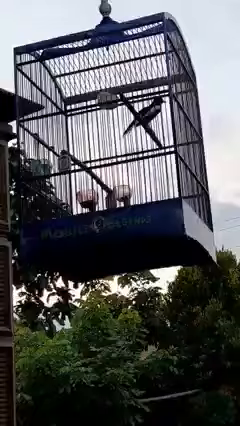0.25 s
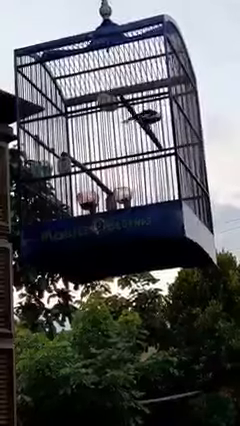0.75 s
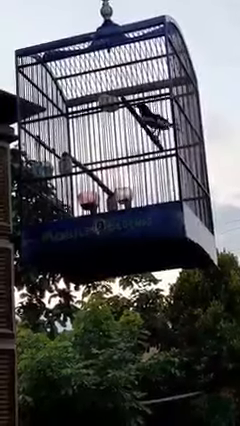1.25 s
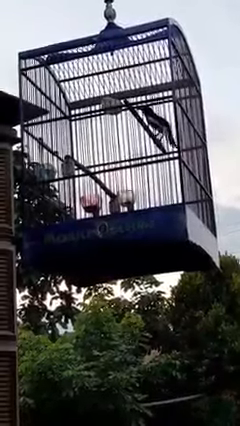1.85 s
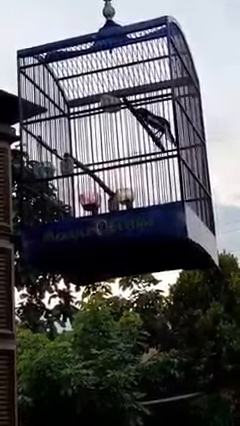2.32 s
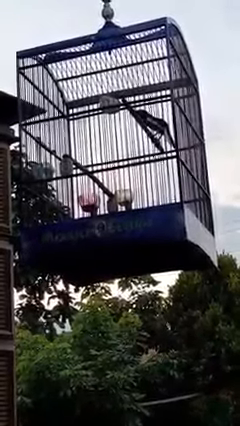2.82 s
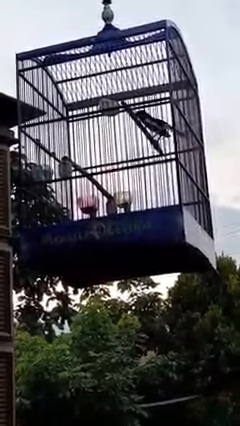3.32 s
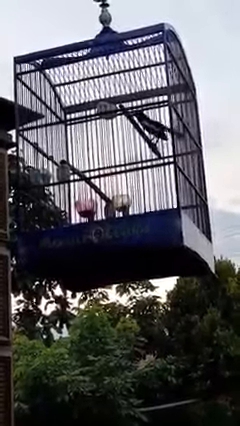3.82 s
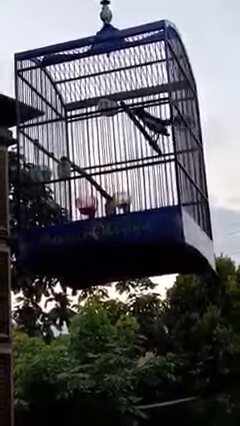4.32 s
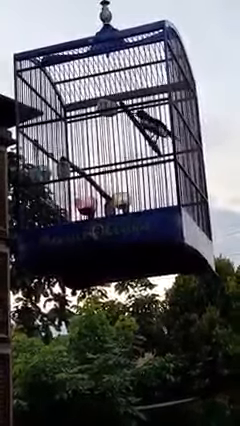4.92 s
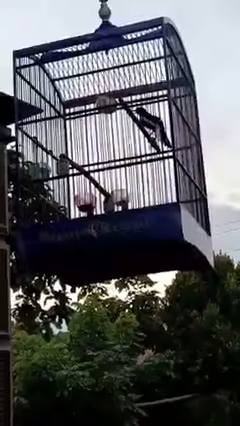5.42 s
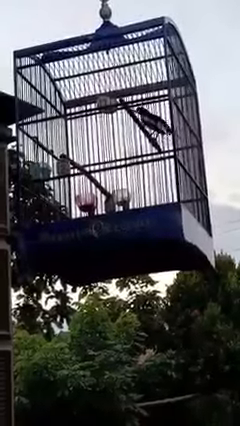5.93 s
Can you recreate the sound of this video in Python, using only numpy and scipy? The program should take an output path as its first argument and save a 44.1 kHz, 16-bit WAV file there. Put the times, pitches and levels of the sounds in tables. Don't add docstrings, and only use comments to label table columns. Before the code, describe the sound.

Bright, quick bird notes and raspy bursts ring off nearby walls, with small cage ticks, soft distant poultry and low traffic underneath.

```python
import sys
import numpy as np
from scipy import signal
from scipy.fft import rfft, irfft, next_fast_len
from scipy.io import wavfile
from scipy.ndimage import uniform_filter1d, map_coordinates

SR = 44100
rng = np.random.default_rng(int(sys.argv[2]) if len(sys.argv) > 2 else 0)


def amp(db):
    return 10 ** (np.asarray(db, float) / 20)


def write(x):
    x = np.atleast_2d(x).T
    wavfile.write(sys.argv[1], SR, np.round(np.clip(x, -1, 1) * 32767).astype(np.int16))


N = 271653
TOP_HZ = 15780


def unit(x):
    return x / np.sqrt(np.mean(x ** 2) + 1e-20)


def along(points, hz):
    f, v = np.transpose(points)
    return np.interp(np.log(hz + 1), np.log(f + 1), v)


def wobble(rate_hz):
    knots = rng.standard_normal(int(N * rate_hz / SR) + 4)
    return map_coordinates(knots, [np.arange(N) * rate_hz / SR])


def filtered(x, response):
    m = next_fast_len(N + SR // 2)
    return irfft(rfft(x, m) * response(np.fft.rfftfreq(m, 1 / SR)), m)[..., :N]


def sung(rows, gesture):
    notes = []
    for s, length_s, from_hz, to_hz, db in rows:
        notes.append([(s + along_s * length_s, from_hz + min(glide, 1) * (to_hz - from_hz), db + under_db, second_db)
                      for along_s, glide, under_db, second_db in gesture])
    return notes


def voice(notes, jitter, flutter_db, flutter_hz, fall_db, edge_s):
    out, t = np.zeros(N), np.arange(N) / SR
    waver, flutter = wobble(flutter_hz), wobble(flutter_hz)
    for note in notes:
        s, hz, db, second_db = np.transpose(note)
        span = slice(max(round((s[0] - edge_s) * SR), 0), min(round((s[-1] + edge_s) * SR), N))
        now = t[span]
        pitch = uniform_filter1d(np.interp(now, s, hz), size=200) * (1 + jitter * waver[span])
        phase = 2 * np.pi * np.cumsum(pitch) / SR
        tone = np.sin(phase)
        for k in range(2, 7):
            overtone_db = np.interp(now, s, second_db) - fall_db * (k - 2)
            tone += amp(overtone_db) * np.sin(k * phase) * (k * pitch < TOP_HZ)
        edges = np.clip(np.minimum(now - s[0], s[-1] - now) / (2 * edge_s) + .5, 0, 1)
        level = amp(np.interp(now, s, db) + flutter_db * flutter[span])
        out[span] += level * np.sin(np.pi / 2 * edges) ** 2 * tone
    return out


# (frequency [Hz], correlation [-1 to 1])
ALIKE = [(30, 0.83), (150, 1), (300, 0.96), (600, 0.68), (2000, 0.044), (10000, 0.069)]


def rush(spectrum, patchy_db):
    z = signal.stft(rng.standard_normal((2, N)), nperseg=512)[2]
    field = uniform_filter1d(uniform_filter1d(rng.standard_normal(z.shape[1:]), 6, 0), 14, 1)
    pair = signal.istft(z * amp(patchy_db * unit(field)), nperseg=512)[1][:, :N]

    def mid_side(hz):
        turn = np.arccos(np.clip(along(ALIKE, hz), -1, 1)) / 2
        return amp(along(spectrum, hz)) * [np.cos(turn), np.sin(turn)]

    mid, side = filtered(pair, mid_side)
    return unit(np.array([mid + side, mid - side]))


# (time [s], level [dB])
TRAFFIC = [(0.0, -39.5), (0.08, -40.5), (0.91, -43.5), (2.371, -42), (2.68, -42.5), (2.859, -40.5),
           (3.519, -42), (4.32, -40.5), (5.15, -41.5), (5.35, -41.5), (5.711, -40), (5.832, -40.5),
           (6.02, -40.5), (6.16, -35)]
# (frequency [Hz], density [dB per Hz])
RUMBLE = [(13, -56), (22, -32), (54, -2), (102, 1.5), (223, -5.5), (415, -19), (563, -23.5), (610, -25.5),
          (693, -23.5), (762, -26.5), (1000, -28.5), (1300, -33), (2200, -120)]
# (frequency [Hz], density [dB per Hz])
AIR = [(410, -63), (700, -28.5), (1290, -14.5), (1450, -13.5), (2280, -15), (2910, -13.5), (3320, -13),
       (4300, -13), (7900, -23), (15500, -26.5)]


def background():
    s, db = np.transpose(TRAFFIC)
    level_db = np.interp(np.arange(N) / SR, s, db) + 1.0 * wobble(3.91)
    return amp(level_db) * rush(RUMBLE, patchy_db=1.0) + amp(-50.5) * rush(AIR, patchy_db=5.5)


# (frequency [Hz], density [dB per Hz])
BREATH = [(600, -29.5), (1500, -16.5), (3000, 7.5), (5000, 6.5), (7000, 3), (10000, -5.5), (13000, -3.5),
          (16000, -4)]


def bird():
    air_db = [(whistles() + chips(), -24.5), (song(), -16.0), (rises(), -19.5), (chatter(), -7.0), (husky(), -18.5)]
    rasp = unit(filtered(rng.standard_normal(N), lambda hz: amp(along(BREATH, hz))))
    out = np.zeros(N)
    for tone, db in air_db:
        effort = np.sqrt(np.abs(uniform_filter1d(tone ** 2, size=200)))
        out += tone + amp(db) * effort * rasp
    return out


# (start [s], length [s], from [Hz], to [Hz], peak [dB])
CHATTER = [(0, 0.017, 6090, 5920, -38.5), (.16, 0.025, 6240, 5800, -38), (.365, 0.032, 1480, 2420, -42.5),
           (2.645, .03, 6330, 6800, -48), (2.845, .02, 6420, 5550, -42), (3.08, 0.055, 5900, 5570, -45.5),
           (3.08, 0.04, 4410, 3870, -46.5), (2.28, .04, 6700, 5900, -33), (2.315, .03, 5300, 6500, -37),
           (2.42, .1, 5600, 5500, -49), (2.394, 0.0072, 3180, 5200, -36), (4.32, 0.053, 3680, 3590, -57.5),
           (4.165, 0.013, 1785, 3000, -43.5), (1.085, 0.039, 3440, 4100, -48),
           (2.25, 0.034, 5430, 5405, -29), (2.3, 0.067, 6190, 5430, -39.5), (2.652, 0.031, 3950, 3750, -36),
           (2.38, 0.047, 6270, 5060, -43.5), (2.645, 0.026, 4660, 5050, -44.5),
           (2.727, 0.0097, 4000, 4000, -25.5), (2.742, 0.011, 4044, 4000, -27),
           (2.74, 0.014, 4620, 4880, -31), (2.825, 0.042, 3897, 3930, -34),
           (2.925, 0.03, 4020, 3880, -36.5), (2.94, 0.012, 6560, 5400, -38), (3.44, 0.05, 4410, 4850, -46),
           (3.55, 0.06, 4374, 4520, -44), (4.318, 0.014, 4840, 4240, -39.5), (5.91, 0.092, 3310, 3900, -59)]
# (length share [0-1], glide share [0-1], level re peak [dB], 2nd harmonic re 1st [dB])
RASP = [(0, 0.0052, 1, -46), (1.002, 0.97, -4, -5)]


def chatter():
    return voice(sung(CHATTER, RASP), jitter=.03, flutter_db=4.0, flutter_hz=400, fall_db=13.5, edge_s=0.004)


# (time [s], left lag [samples], left-right [dB])
BEARING = [(0, 0.5, -4), (1.8, 0.58, -3), (2.1, 4.2, 0), (4.599, 4.74, -3), (4.998, 6.9, -0.5),
           (6.16, 5.4, -5.5)]


def placed(x):
    s, lag, pan_db = np.transpose(BEARING)
    n, side = np.arange(N), np.array([[.5], [-.5]])
    where = n - side * np.interp(n / SR, s, lag)
    return map_coordinates(x, [where]) * amp(side * np.interp(n / SR, s, pan_db))


# (delay [s], left [dB], right [dB])
WALLS = [(.005, -6, -11), (0.011, -14, -7), (0.019, -13, -14), (0.029, -14, -13), (0.04, -19, -13),
         (.052, -20, -15)]


def walls(x):
    scatter_t60_s = 0.0053
    t, answer = np.arange(SR // 100) / SR, np.zeros((2, SR // 12))
    for s, left_db, right_db in WALLS:
        scatter = rng.standard_normal((2, len(t))) * amp(-60 * t / scatter_t60_s)
        scatter /= np.linalg.norm(scatter, axis=1, keepdims=True)
        answer[:, round(s * SR):][:, :len(t)] += amp([[left_db], [right_db]]) * scatter
    return signal.fftconvolve(x[None], answer, axes=1)[:, :N]


# (frequency [Hz], t60 [s])
YARD = [(500, 0.26), (2000, 0.31), (5000, 0.33), (12000, 0.27)]


def yard(x, first_s):
    hz, t, z = signal.stft(rng.standard_normal((2, SR * 3 // 4)), SR, nperseg=256)
    tail = signal.istft(z * amp(-60 * t / along(YARD, hz)[:, None]), SR, nperseg=256)[1]
    late = np.pad(x, (round(first_s * SR), 0))
    return signal.fftconvolve(late[None], tail / np.linalg.norm(tail[0]), axes=1)[:, :N]


# (length share [0-1], glide share [0-1], level re peak [dB], 2nd harmonic re 1st [dB])
DROPS = [
    (.02, 0.016, 2196, 1146, -28),
    (2.03, .07, 2190, 1015, -30.5),
]
DROP = [(0, 0.0073, -8.5, -24), (0.402, .15, -10.5, -29), (0.998, 1, -21.5, 14.5)]
ARCHES = [
    (.11, .046, 3356, 4293, -26.5),
]
ARCH = [(0, 0.033, -16, 8), (0.202, .93, -5.5, -9), (.45, 1, 2.5, -3.5), (0.748, .35, -14, -3.5),
        (1, 0.012, -4.5, -6)]
LIFTS = [(.788, 0.046, 3140, 4460, -31.5), (2.105, 0.043, 4020, 4540, -41.5), (2.24, .055, 5700, 6900, -30),
         (2.085, .03, 1300, 2500, -44), (2.392, 0.027, 2500, 3120, -30), (4.1, 0.029, 4040, 4780, -41),
         (4.14, 0.1, 4800, 5790, -50), (1.555, 0.017, 5280, 5450, -36), (1.2, 0.0099, 4950, 5080, -28.5)]
LIFT = [(0, 0, -7, -1.5), (0.351, 0.41, -1.5, -6), (0.649, 0.77, -1, -17), (1, 0.79, 0.5, -7.5)]
WARBLES = [
    (2.62, 0.061, 1220, 2303, -35),
    (2.89, 0.066, 1291, 2294, -36.5),
    (4.158, 0.0113, 1535, 1900, -44),
]
WARBLE = [(0, 0.0044, -25.5, 2), (0.221, 1, 2.5, -14), (0.4, 0.85, -1, -17), (.65, .45, -12.5, 1.5),
          (0.999, 0.13, -9, -4.5)]
FLICKS = [
    (2.694, 0.019, 1390, 2345, -35.5),
    (2.978, .018, 1407, 2290, -34),
]
FLICK = [(0, 0.01, -13, -30), (.62, .86, -3.5, -31), (1, .99, 0.5, -29)]
REEDS = [
    (3.835, 0.024, 2240, 2194, -40.5),
    (3.95, .05, 1812, 2280, -45.5),
]
REED = [(0, 0.2, -11, 12), (0.4, .8, -0.5, 12), (1, 1, -4.5, 4)]


def song():
    kinds = [(LIFTS, LIFT), (DROPS, DROP), (ARCHES, ARCH), (WARBLES, WARBLE), (FLICKS, FLICK), (REEDS, REED)]
    notes = [note for rows, gesture in kinds for note in sung(rows, gesture)]
    return voice(notes, jitter=0.011, flutter_db=3.5, flutter_hz=260, fall_db=19.0, edge_s=0.0027)


# (start [s], length [s], from [Hz], to [Hz], peak [dB])
RISES = [
    (.078, 0.038, 4450, 6060, -35),
    (1.145, 0.055, 3138, 5066, -22.5),
    (1.496, 0.058, 3300, 4897, -25.5),
    (1.92, 0.03, 1286, 1595, -51),
    (2.205, 0.032, 3000, 5140, -30.5),
    (3.4, 0.035, 4554, 5800, -65.5),
    (4.72, 0.08, 4550, 5860, -54),
]
# (length share [0-1], glide share [0-1], level re peak [dB], 2nd harmonic re 1st [dB])
RISE = [(0, 0.15, -10, -10), (0.448, .4, -2, -5.5), (0.799, .68, 3, -18.5), (0.999, 0.99, 1, -4.5)]


def rises():
    return voice(sung(RISES, RISE), jitter=.006, flutter_db=2.2, flutter_hz=300, fall_db=5.0, edge_s=.003)


# (length share [0-1], glide share [0-1], level re peak [dB], 2nd harmonic re 1st [dB])
HOLDS = [(.178, 0.045, 2047, 2639, -28), (.235, 0.02, 2580, 2652, -34), (1.712, 0.05, 5550, 5860, -24),
         (1.957, 0.095, 2350, 2655, -32), (2.1, 0.095, 2380, 2995, -34), (3.55, 0.076, 1710, 1590, -57),
         (3.835, 0.014, 3260, 3415, -41.5), (3.835, 0.021, 5370, 5660, -51),
         (3.945, 0.019, 3080, 3000, -49), (4.235, 0.06, 2760, 2839, -38)]
HOLD = [(0, 0, -10.5, -12), (0.225, 0.75, 0, -81), (0.602, 0.94, -0.5, -34.5), (1.002, 0.88, -3, -29)]
SETTLES = [
    (1.345, 0.047, 6300, 5926, -29),
    (2.396, 0.012, 4200, 3843, -26),
    (3.088, 0.046, 3343, 2873, -30.5),
    (4.65, 0.058, 3360, 2980, -35),
]
SETTLE = [(0, 0.13, -22, 1), (0.199, 0.55, -2.5, -19), (0.451, .9, -0.5, -46.5), (1, 0.95, -1, -8.5)]


def whistles():
    notes = sung(HOLDS, HOLD) + sung(SETTLES, SETTLE)
    return voice(notes, jitter=0.006, flutter_db=4.0, flutter_hz=200, fall_db=19.5, edge_s=0.0037)


# (length share [0-1], glide share [0-1], level re peak [dB], 2nd harmonic re 1st [dB])
SCRAPES = [(.24, 0.038, 2700, 3300, -37), (.46, 0.05, 5900, 5000, -63), (3.5, 0.066, 1050, 1600, -59.5),
           (2.305, 0.086, 2700, 2520, -39), (1.12, .03, 3000, 3400, -42), (1.108, 0.034, 2100, 2800, -36),
           (1.088, .018, 1650, 2050, -44), (1.383, 0.008, 3000, 4000, -34),
           (1.405, 0.01, 3500, 4000, -34.5), (1.2, 0.029, 3300, 4400, -44),
           (1.385, 0.02, 6350, 7140, -38.5), (1.632, 0.045, 1950, 2700, -35),
           (1.6, 0.042, 1400, 1950, -48.5), (1.475, .025, 2950, 3450, -44), (2.255, .025, 1300, 1400, -56),
           (4.17, 0.045, 3200, 4050, -55), (4.53, 0.052, 3750, 4050, -55.5), (4.415, 0.1, 1720, 1960, -45),
           (4.52, 0.02, 3500, 4200, -52.5)]
SCRAPE = [(0, 0.011, -3.5, -26), (0.401, .5, 1.5, -11.5), (1, 1, -1, -28.5)]
BOWS = [
    (3.47, .3, 1604, 3090, -39),
    (3.5, .2, 1202, 2320, -52.5),
]
BOW = [(0, 0, -14, -14), (.15, .4, -8, -26), (.3, .95, 0, -20), (.5, .97, -1, -25), (.66, .55, -6, -40),
       (.82, .15, -9, -30), (1, -.25, -16, -20)]
CLUCKS = [
    (4.176, .034, 2410, 2087, -32),
    (4.53, .026, 2424, 2106, -30),
]
CLUCK = [(0, 0, -8.5, -38), (.4, 0.5, -11.5, -41), (.6, 1, -0.5, -32), (1, 0.99, -10, -21)]


def husky():
    notes = sung(BOWS, BOW) + sung(CLUCKS, CLUCK) + sung(SCRAPES, SCRAPE)
    return voice(notes, jitter=.022, flutter_db=5.0, flutter_hz=300, fall_db=8.0, edge_s=.003)


# (length share [0-1], glide share [0-1], level re peak [dB], 2nd harmonic re 1st [dB])
CROWS = [
    (.32, 0.36, 898, 1267, -64.5),
    (3.23, 0.27, 1028, 1346, -64.5),
]
CROW = [(0, 0.11, 9, -5), (.13, 0.96, 3, -13), (0.271, 0.98, 1.5, -20), (0.6, .45, 3, 2),
        (1, 0.067, -14, 1)]
COOS = [(.4, 0.15, 3644, 3750, -63), (.57, .1, 2210, 1945, -60), (.8, 0.53, 825, 826, -68),
        (1.15, 0.14, 815, 958, -63), (1.7, 0.13, 567, 594, -58), (1.86, 0.25, 627, 636, -67.5),
        (2.12, 0.097, 596, 529, -58.5), (2.55, 0.18, 645, 722, -67), (2.75, .4, 696.4, 693, -63.5),
        (3.22, 0.32, 681, 644, -65), (5.6, 0.2, 1293, 1220, -63.5), (5.95, 0.1, 1188, 1247, -60),
        (5.87, 0.17, 559, 533, -66)]
COO = [(0, 0, 11, -35), (0.401, 0.7, 2.3, -39), (1, 0.94, 1.1, -29)]


def poultry():
    notes = sung(CROWS, CROW) + sung(COOS, COO)
    return voice(notes, jitter=0.0054, flutter_db=3.5, flutter_hz=40, fall_db=17.5, edge_s=0.014)


# (start [s], length [s], from [Hz], to [Hz], peak [dB])
NEIGHBOUR = [
    (.378, .18, 2420, 2340, -36),
    (4.82, 0.16, 1453, 1726, -43.5),
    (5.088, 0.13, 2642, 2838, -38),
    (5.29, 0.17, 1395, 1736, -43),
    (5.555, 0.1386, 2642, 2774, -37),
    (5.76, 0.13, 1432, 1663, -44),
]
# (length share [0-1], glide share [0-1], level re peak [dB], 2nd harmonic re 1st [dB])
PURE = [(0, 0.013, -1.2, -30), (.5, .65, 1, -39), (1.001, 1, -2, -32)]


def neighbour():
    return voice(sung(NEIGHBOUR, PURE), jitter=0.0031, flutter_db=3.0, flutter_hz=70, fall_db=34, edge_s=0.0094)


# (time [s], peak [dB], brightness [dB])
TICKS = [
    (.625, -42, 0),
    (.893, -33, -3),
    (.903, -31, -3),
    (1.465, -33, -30),
    (1.495, -33, -30),
    (2.278, -37, -22),
]


def cage():
    out, t = np.zeros(N + SR), np.arange(SR // 50) / SR
    for s, db, bright_db in TICKS:
        crack = amp(db + 12.5 - 60 * t / 0.0019) * rng.standard_normal(len(t))
        dull = uniform_filter1d(crack, size=6)
        out[round(s * SR):][:len(t)] += dull + amp(bright_db) * (crack - dull)
    return out[:N]


# (start [s], length [s], frequency [Hz], level [dB])
STAND_INS = [
    (1.517, .06, 16000, -39),
    (1.515, 0.03, 15300, -32),
]


def stand_ins():
    t, out = np.arange(N) / SR, np.zeros(N)
    for s, length_s, hz, db in STAND_INS:
        ramp = np.clip(np.minimum(t - s, s + length_s - t) / .01, 0, 1)
        out += amp(db) * np.sin(2 * np.pi * hz * t) * ramp
    return out


# (start [s], length [s], from [Hz], to [Hz], peak [dB])
STRIKES = [
    (2.436, 0.12, 2880, 2770, -20.5),
    (3.139, 0.045, 2880, 2860, -21),
]
# (length share [0-1], glide share [0-1], level re peak [dB], 2nd harmonic re 1st [dB])
STRIKE = [(0, 0, 1, -40), (.12, .4, 2, -44), (.3, .6, -5, -40), (.8, .85, -7, -36), (1, 1, -15, -30)]


def struck():
    notes = sung(STRIKES, STRIKE)
    x = amp(9.5) * voice(notes, jitter=0.009, flutter_db=1.8, flutter_hz=190, fall_db=14, edge_s=0.002)
    return placed(x) + amp(-9) * yard(x, first_s=0.02)


# (length share [0-1], glide share [0-1], level re peak [dB], 2nd harmonic re 1st [dB])
DEEP_CHIPS = [
    (4.83, 0.037, 4124, -22),
    (5.915, 0.044, 4080, -27.5),
    (6.116, 0.031, 4120, -24),
]
DEEP_CHIP = [(0, 0.32, -24, -25), (0.301, .93, -10.5, -31), (0.549, 0.97, 1.5, -21), (0.852, .3, -2, -17),
             (1.001, 0.026, -8, 6.5)]
CHIPS = [
    (5.147, 0.049, 4840, -25),
    (5.465, 0.046, 4710, -27),
    (5.696, .036, 4490, -27.5),
]
CHIP = [(0, -.4, -25.5, -49), (0.199, .9, -3, -39), (.5, 1, -1, -13), (.85, .31, 1.5, -28),
        (1, -0.03, -7, -19.5)]


def chips():
    top_hz = 6900
    notes = []
    for rows, gesture in [(CHIPS, CHIP), (DEEP_CHIPS, DEEP_CHIP)]:
        notes += sung([(s, length_s, foot_hz, top_hz, db) for s, length_s, foot_hz, db in rows], gesture)
    return voice(notes, jitter=.021, flutter_db=4.0, flutter_hz=500, fall_db=11.5, edge_s=.003)


def scene():
    near = amp(7.5) * bird() + cage()
    far = amp(4.0) * neighbour() + amp(6.0) * poultry()
    direct = placed(near) + far * amp([[-.3], [.3]])
    echo = amp(-2.0) * yard(near + amp(-2.0) * far, first_s=0.015) + walls(near)
    return direct + echo + background() + struck()


def outline(v):
    return np.sqrt(np.abs(uniform_filter1d(np.abs(v) ** 2, size=24, axis=1)) + 1e-20)


def thrifty(x, split_hz, near_db, frame_db, chance_db, weak_db):
    hz, t, z = signal.stft(x, SR, nperseg=1024)
    column_hz = hz[:, None]
    above, treble = column_hz > 900, column_hz > split_hz
    lasting = uniform_filter1d(np.abs(z) ** 2 * above, size=4, axis=2)
    band = uniform_filter1d(lasting, size=10, axis=1)
    wide = uniform_filter1d(lasting, size=80, axis=1) * np.clip(column_hz / 4200, 0, 1) ** 5
    loudest = lasting.mean(1, keepdims=True) * np.clip(column_hz / 4000, 0, 1) ** 2
    patches = rng.standard_normal((len(hz) // 8 + 1, len(t) // 6 + 1))
    luck = np.kron(patches, np.ones((8, 6)))[:len(hz), :len(t)]
    masked = band * amp(2 * chance_db * luck) < amp(2 * near_db) * wide + amp(2 * frame_db) * loudest
    weak = lasting < amp(2 * weak_db) * band
    hiss = signal.stft(rng.standard_normal(x.shape), nperseg=1024)[2]
    grain = 0.7 * z * ~weak / outline(z) + 0.32 * hiss / outline(hiss)
    source = np.arange(len(hz)) - np.where(hz < 11500, 88, 176)
    rebuilt = np.where(treble, outline(z * treble) * grain[:, source], z * ~(weak & above))
    return signal.istft(rebuilt * ~(masked & above), SR, nperseg=1024)[1][:, :N]


def low_pass(x):
    return signal.sosfilt(signal.butter(12, 15770, fs=SR, output="sos"), x)


# (frequency [Hz], left-right [dB])
TILT = [(60, -1.7), (500, -1.6), (1500, 0), (4000, -1.5), (8500, 0.5), (13000, .3)]
# (frequency [Hz], gain [dB])
PHONE = [(7050, -0.5), (7350, -2.5), (7800, -13), (8300, -9), (9500, -2), (12500, 3), (14400, -3.5),
         (15000, -8.5), (15700, -6)]


def record(dry):
    lag_s = 9 / 44100

    def ports(hz):
        lag = np.exp(1j * np.pi * hz * lag_s * np.array([[1], [-1]]))
        colour = amp(along(TILT, hz) * np.array([[.5], [-.5]])) * amp(along(PHONE, hz))
        return lag * colour * (hz < TOP_HZ)

    heard = filtered(dry, ports)
    mix = thrifty(heard, split_hz=7200, near_db=-15.5, frame_db=-32, chance_db=4, weak_db=-4) + stand_ins()
    return low_pass(mix)


dry = scene()
out = record(dry)
write(out)
```